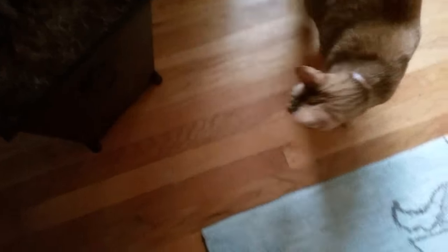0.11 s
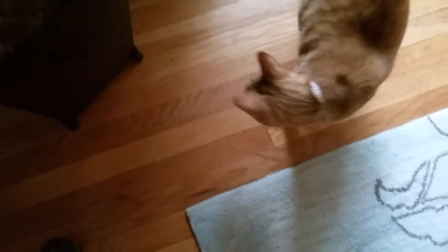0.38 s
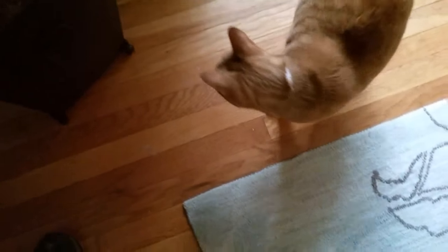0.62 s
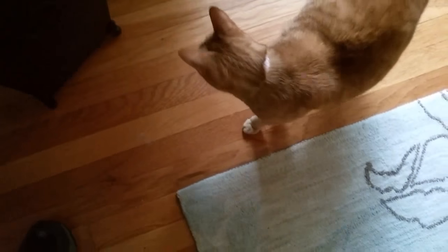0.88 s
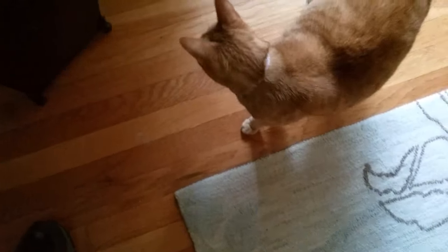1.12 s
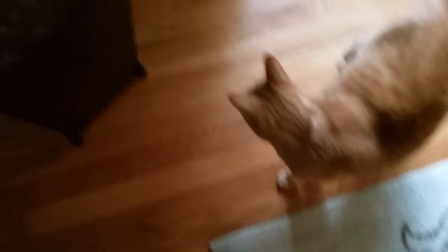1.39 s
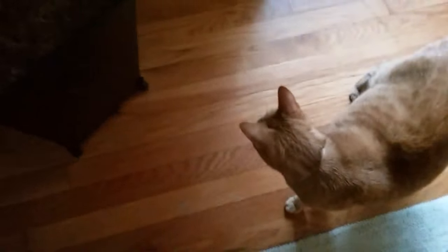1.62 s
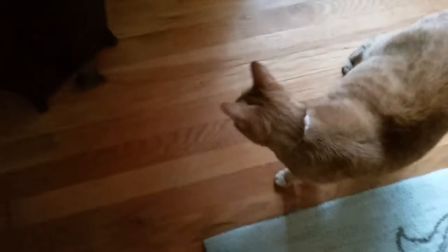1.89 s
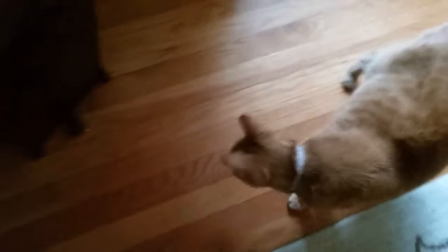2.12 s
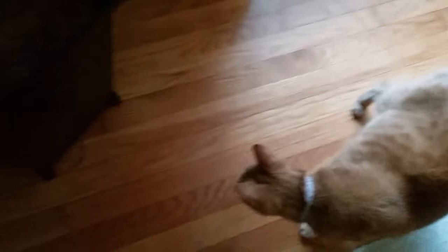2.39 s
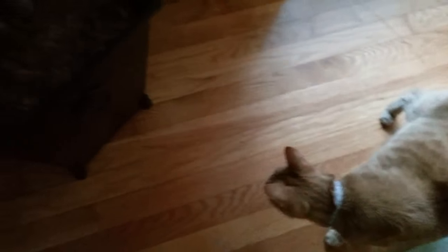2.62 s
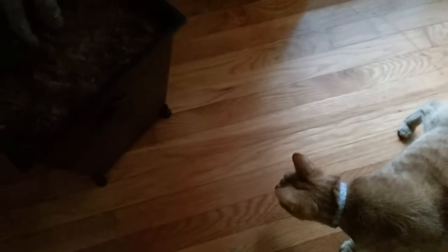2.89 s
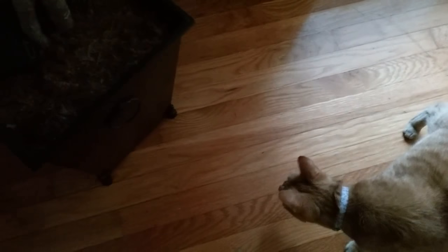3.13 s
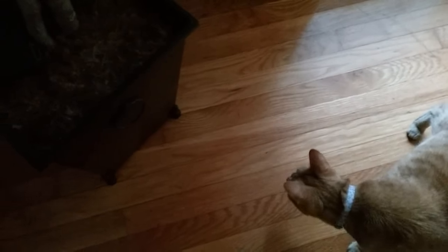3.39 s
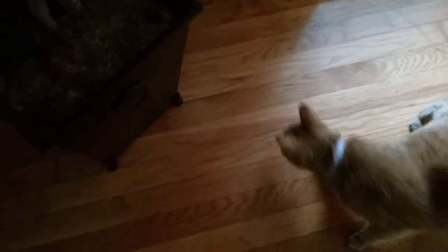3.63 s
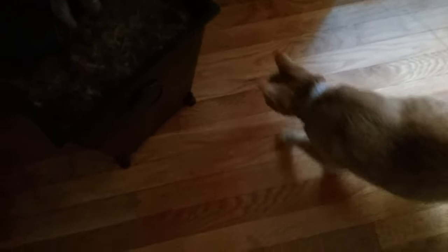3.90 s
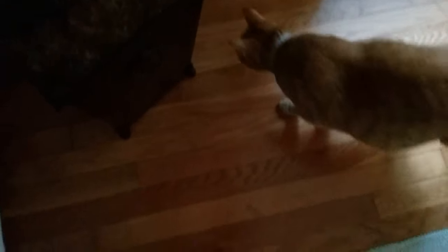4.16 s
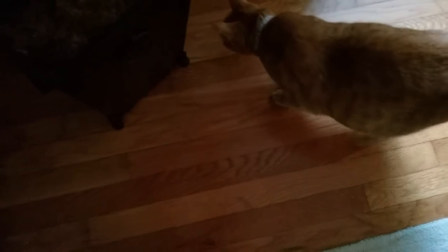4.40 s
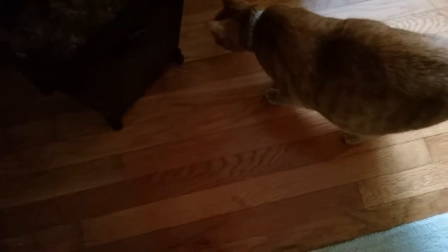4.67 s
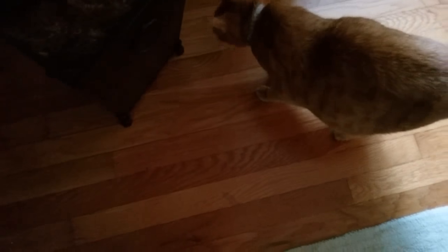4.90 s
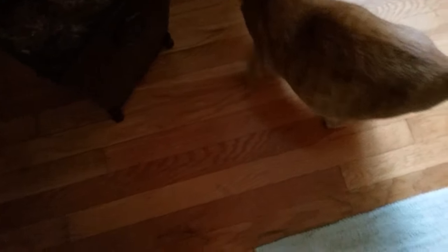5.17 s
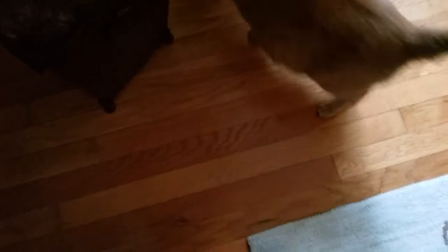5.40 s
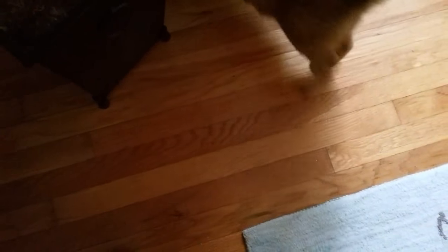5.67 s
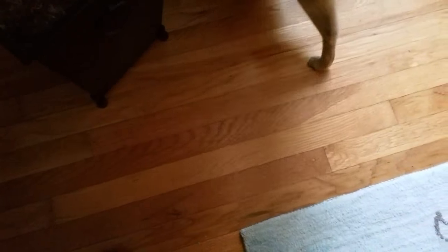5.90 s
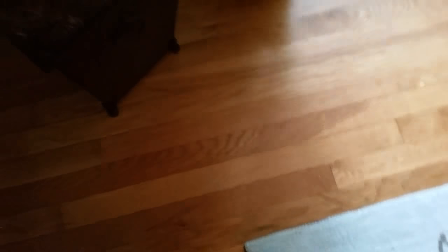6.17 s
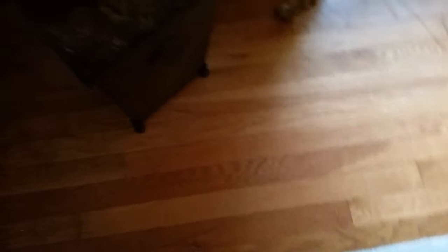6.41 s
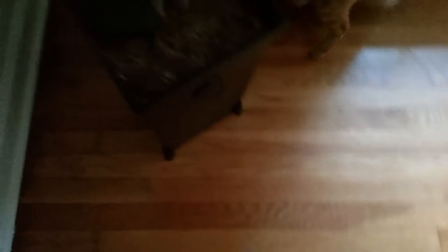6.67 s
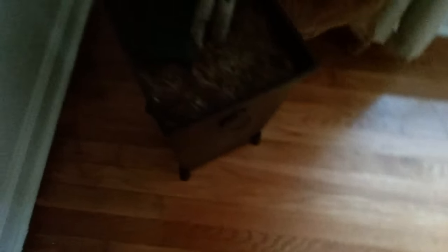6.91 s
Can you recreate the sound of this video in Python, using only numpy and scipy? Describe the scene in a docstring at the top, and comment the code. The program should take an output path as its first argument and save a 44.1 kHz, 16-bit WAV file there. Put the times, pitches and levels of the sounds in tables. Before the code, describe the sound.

A quiet room with a hardwood floor, picked up close by a hand-held phone with faint low hiss. Soft rubbing lies underneath throughout. A small knock comes at once, with tiny claw ticks through the first 0.7 s. Soft paw thumps begin, with a clearer one at 1.2 s, while a light, dense patter builds from about 1.3 s. At 2.1 s a heavy padded landing hits, followed by a claw click and a sharp woody knock at 2.27 s; scuffing trails away and the patter stops by 2.5 s. From 2.6 to 4.8 s only faint ticks, small taps and brushing remain. At 4.9 s comes the strongest thud, with hard knocks and scuffing. Lighter steps follow, then another thump and knock near 5.63 s. Small taps and short scrapes around 6 to 6.3 s give way to faint rubbing until about 7 s.

```python
"""A cat stalks a small toy and pounces on a wooden floor indoors, near a hand-held phone.
Over faint rubbing come a knock and small claw ticks, then from 0.7 s a patter and soft paw thumps.
Heavier landings, knocks and scuffs come near 2.1 s, again from 4.9 s and near 5.6 s; rubbing ends it.
Thumps and knocks ring board modes, ticks are damped sines, scuffs and hiss are noise; the room answers.
The phone has two unlike microphone ports and turns quiet sound further down."""
import sys
import numpy as np
from scipy import signal
from scipy.fft import rfft, irfft, next_fast_len
from scipy.io import wavfile
from scipy.ndimage import uniform_filter1d, minimum_filter1d, map_coordinates

SR = 44100
rng = np.random.default_rng(int(sys.argv[2]) if len(sys.argv) > 2 else 0)


def level_to_linear(level):
    """Convert decibel levels to linear amplitude factors, elementwise."""
    exponent = np.asarray(level, float) / 20
    return 10 ** exponent


def master_out(mix):
    """Clip the mix to full scale and print it as 16-bit PCM to the path in sys.argv[1]."""
    frames = np.transpose(np.atleast_2d(mix))
    ceiling = np.clip(frames, -1, 1)
    pcm = np.round(ceiling * 32767).astype(np.int16)
    wavfile.write(sys.argv[1], SR, pcm)


N = 310407  # length [samples]


def unit(x):
    """x at rms 1."""
    return x / np.sqrt(np.mean(x ** 2) + 1e-20)


def along(points, hz):
    """(Hz, value) points read on a log frequency axis."""
    f, v = np.transpose(points)
    return np.interp(np.log(hz + 1), np.log(f + 1), v)


def filtered(x, response):
    """x times a complex response of frequency."""
    n = x.shape[-1]
    m = next_fast_len(n + 8192)
    return irfft(rfft(x, m) * response(np.fft.rfftfreq(m, 1 / SR)), m)[..., :n]


def pair(two):
    """Two unrelated signals mixed to the likeness that the ports hear."""
    # left-right likeness of diffuse sound: (frequency [Hz], correlation [0-1])
    likeness = [(100, 0.95), (400, 1), (1200, 0.33), (2500, 0.63), (6000, 0.051)]

    def turn(hz):
        return np.arccos(np.clip(along(likeness, hz), 0, 1)) / 2

    mid, side = filtered(two, lambda hz: np.array([np.cos(turn(hz)), np.sin(turn(hz))]))
    return np.array([mid + side, mid - side])


def boards(length_s, scatter_db, spread=0.):
    """The ring of the floor after one unit blow: new strengths, phases spread over a share of a turn."""
    # modes of the boards under the animal: (frequency [Hz], level [dB], t60 [s])
    board_modes = [(163, -21, 0.048), (215.5, 3, 1), (225.8, 12.5, 0.053), (295.3, 0, 0.49),
                   (356, -1, 0.14), (394, 1, 0.09), (502, -9, 0.75), (608.3, 0, 0.091), (704, -12.5, 0.39),
                   (851, 0, 0.021), (884.6, 4.5, 0.02), (1185, 5.5, 0.01), (1454, -1, 0.023),
                   (1900, -27, 0.017), (2262, -4, 0.018), (2975, -22, 0.09)]
    t = np.arange(int(length_s * SR)) / SR
    hz, db, t60 = np.transpose(board_modes)[:, :, None]
    level = db + scatter_db * rng.standard_normal(db.shape) - 60 * t / t60
    phase = 2 * np.pi * (hz * t + spread * rng.random(db.shape))
    return (level_to_linear(level) * np.sin(phase)).sum(0)


def add(out, s, sound, wet_db, seed):
    """Places a sound and a fresh room echo of its seed blow, each frequency dying at its own speed."""
    # decay of the room: (frequency [Hz], t60 [s])
    room_decay = [(80, 0.18), (300, 0.58), (600, 0.37), (1000, 0.24), (3000, 0.2), (10000, 0.36)]
    hz, t, z = signal.stft(rng.standard_normal((2, SR // 2)), SR, nperseg=256)
    decaying = z * level_to_linear(-60 * t / along(room_decay, hz)[:, None])
    tail = pair(signal.istft(decaying, SR, nperseg=256)[1])
    late = np.clip(np.arange(tail.shape[1]) / SR / 0.0017, 0, 1)  # walls answer a little late
    tail *= late / np.linalg.norm(tail[0])
    heard = level_to_linear(wet_db) * signal.fftconvolve(seed[None], tail, axes=1)
    heard[:, :len(sound)] += sound
    i = round(s * SR)
    out[:, i:i + heard.shape[1]] += heard[:, :out.shape[1] - i]


def scuff():
    """Fur and pads rub the wood: noise in drifting patches with sparse fibre ticks, in uneven strokes."""
    # spectrum of the rubbing: (frequency [Hz], relative density [dB per Hz])
    fur_colour = [(200, -43), (500, 2), (1000, 2.5), (2000, -0.5), (4000, -9), (8000, -18), (14000, -16.5)]
    # strokes: (start [s], length [s], mid-stroke level [dB], swell from start to end [dB])
    strokes = [(1.34, 0.3, -76, 22), (1.641, 0.45, -65, 0.5), (2.082, 0.31, -67.5, -3),
               (2.293, 0.35, -59, -12.5), (2.62, 0.4, -83, 21), (3.715, 0.017, -80, 0),
               (3.836, 0.02, -93, -8), (4.33, 0.77, -74.5, -3), (4.896, 0.21, -63, -3),
               (5.02, 0.39, -71, -11), (5.387, 0.13, -65.5, 15), (5.517, 0.11, -67, -13),
               (5.635, 0.18, -60.5, -12.5), (5.82, 0.35, -65, 5), (6.109, 0.021, -55, 6),
               (6.147, 0.15, -63, 5), (6.165, 0.013, -67, 2), (6.307, 0.035, -63.5, -11),
               (6.32, 0.91, -74.5, -9.5)]
    rest_db = -71  # faint rubbing under all strokes
    edge_s = 0.023  # fade at both ends of a stroke
    flutter_db, flutter_per_s = 1.2, 20  # unevenness of the rubbing

    fibres = (rng.random((2, N)) < 60 / SR) * 5 * rng.standard_normal((2, N))
    z = signal.stft(rng.standard_normal((2, N)) + fibres, nperseg=512)[2]
    field = uniform_filter1d(rng.standard_normal(z.shape[1:]), 16, 0)  # smooth over frequency
    field = uniform_filter1d(field, 5, 1)  # and over time
    patchy = signal.istft(z * level_to_linear(1.5 * unit(field)), nperseg=512)[1][:, :N]
    rub = unit(pair(filtered(patchy, lambda hz: level_to_linear(along(fur_colour, hz)))))

    t = np.arange(N) / SR
    pressure = np.full(N, level_to_linear(rest_db))
    for s, length, db, swell_db in strokes:
        swell = level_to_linear(db + swell_db * np.clip((t - s) / length - .5, -1, 1))
        inside_s = np.minimum(t - s, s + length - t)
        pressure += swell * np.clip(inside_s / edge_s + .5, 0, 1)
    flutter = map_coordinates(rng.standard_normal(400), [t * flutter_per_s])
    return pressure * level_to_linear(flutter_db * flutter) * rub


def knocks():
    """Paw bones and toy: a hard contact rings the upper board modes and chatters briefly."""
    # knocks: (time [s], ring peak [dB], click over the ring [dB], favoured pitch [Hz])
    hits = [(0.064, -44, -10, 880), (1.185, -46, -25, 790), (1.268, -44, -18, 870), (1.688, -44, -20, 710),
            (1.722, -44, -20, 750), (1.902, -47, -20, 900), (2.09, -32, -16, 1040), (2.265, -19, 0, 900),
            (2.271, -22, -5.5, 910), (2.282, -24.5, -8.5, 613), (2.551, -35, -7, 850),
            (3.132, -41, -14, 840), (3.8298, -50, 8, 800), (3.8322, -54, 10, 900), (4.494, -45, -8, 640),
            (4.566, -46, -6.5, 705), (4.677, -47, -6, 744), (4.745, -67, 12, 910), (4.894, -26, -16, 900),
            (4.947, -27.5, -3.5, 950), (4.957, -28, -5, 605), (5.28, -50, -8, 804), (5.536, -44, -14, 915),
            (5.621, -39, -30, 690), (5.632, -28.5, -1, 890), (5.641, -28.5, -11, 596),
            (5.957, -48, -8, 595), (5.975, -48, -12, 620)]
    # spectrum of the click: (frequency [Hz], relative density [dB per Hz])
    click_colour = [(600, -16), (1200, 15), (2500, 6.5), (4000, 1), (7000, -13), (12000, -13.5),
                    (16000, -30)]
    favour_width, favour_db = 0.21, 4  # the struck spot lifts modes near one pitch: width over pitch, lift
    soft_hz, click_db_per_octave = 5870, 13.5  # the duller the contact, the fewer upper modes it reaches
    body_t60_s = 0.77  # the body resting on the boards shortens their ring
    chatter_t60_s, echo_db = 0.031, -2

    out, t = np.zeros((2, N)), np.arange(int(.2 * SR)) / SR
    impulse = 1.0 * (np.arange(len(t)) == 64)
    snap = filtered(impulse, lambda hz: level_to_linear(along(click_colour, hz)))
    rise = 1 - np.exp(-t / 0.00024)
    chatter = rise * level_to_linear(-60 * t / chatter_t60_s)
    for s, db, click_db, pitch in hits:
        top = soft_hz * 2 ** (click_db / click_db_per_octave)

        def contact(hz):
            band = 1j * hz * favour_width * pitch
            spot = 1 + level_to_linear(favour_db) * band / (pitch * pitch - hz * hz + band)
            light = (1j * hz / (450 + 1j * hz)) ** 3  # too light to move the whole floor
            return spot / (1 + 1j * hz / top) ** 2 * light

        struck = rise * level_to_linear(-60 * t / body_t60_s) * boards(.2, scatter_db=2.5, spread=1.0)
        ring = filtered(struck, contact)
        ring *= level_to_linear(db) / abs(ring).max()
        click = chatter * filtered(rng.standard_normal(len(t)), lambda hz: level_to_linear(along(click_colour, hz)))
        click *= level_to_linear(db + click_db) / abs(click).max()
        # the room answers the ring and a single snap as strong as the click
        seed = ring + snap * np.linalg.norm(click) / np.linalg.norm(snap)
        add(out, s, ring + click, echo_db, seed=seed)
    return out


def ticks():
    """A claw tip: a few cycles of two heavily damped modes."""
    # single ticks: (time [s], first-mode level [dB], pitch [Hz], time to fall 60 dB [cycles])
    claw_taps = [(.14, -53, 2600, 9), (.204, -53, 2500, 9), (0.4167, -43, 2900, 7), (0.421, -48, 2700, 14),
                 (0.572, -52, 4300, 7), (.648, -54, 3500, 7), (.76, -55, 3800, 7), (0.85, -55, 2700, 9),
                 (1.5935, -48, 4400, 9), (1.599, -48, 4600, 12), (1.968, -48, 4000, 9),
                 (2.1828, -25.5, 1630, 7), (2.1944, -46, 1020, 7), (2.2248, -31, 1090, 5),
                 (2.5813, -51, 2470, 7), (2.632, -38.5, 2160, 7), (2.7894, -50, 2570, 9),
                 (2.86, -51, 2460, 9), (3.0696, -51, 2600, 9), (3.465, -50, 2940, 12),
                 (3.5058, -54, 3200, 16), (3.529, -54, 2900, 12), (3.5448, -51, 3640, 7),
                 (3.638, -52, 2500, 16), (3.8345, -46, 2900, 20), (3.838, -46, 1930, 20),
                 (3.8305, -47, 5100, 16), (3.854, -49, 2600, 9), (3.906, -56, 6200, 14),
                 (4.331, -51, 3160, 9), (4.6784, -41, 3620, 20), (4.759, -50, 3200, 25),
                 (5.259, -52, 3200, 9), (6.049, -48, 2640, 7), (6.066, -50, 2600, 7), (6.123, -46, 2500, 7),
                 (6.168, -45, 2510, 7)]
    echo_db, edge_rad = -10, 1.1  # an abrupt start gives the tick its crisp top
    overtone, overtone_db = 1.77, -10.5  # second mode: pitch over the first, level
    out, t = np.zeros((2, N)), np.arange(int(.02 * SR)) / SR
    for s, db, hz, cycles in claw_taps:
        first = np.sin(2 * np.pi * hz * t + edge_rad)
        second = level_to_linear(overtone_db) * np.sin(2 * np.pi * overtone * hz * t)
        tick = level_to_linear(db - 60 * t * hz / cycles) * (first + second)
        add(out, s, tick, echo_db, seed=tick)
    return out


def scurry():
    """The toy patters over the boards: dense uneven tiny blows, each ringing briefly."""
    # strength of the patter: (time [s], level [dB])
    patter_level = [(0.7, -82), (1.25, -56), (1.45, -55), (1.62, -51), (1.69, -51.5), (1.92, -49),
                    (2.02, -49.5), (2.23, -48), (2.35, -62), (2.42, -78), (2.65, -87)]
    ring_t60_s = .045  # light contacts ring briefly
    struck = rng.random(N) < 900 / SR  # about 900 blows a second
    blows = struck * level_to_linear(2 * rng.standard_normal(N)) * np.sign(rng.standard_normal(N))
    ring = np.convolve(boards(.3, scatter_db=1), np.hanning(int(.0006 * SR)))
    ring *= level_to_linear(-60 * np.arange(len(ring)) / SR / ring_t60_s)
    patter = unit(signal.fftconvolve(blows, ring)[:N])
    # chance swells are flattened, so the patter keeps a fairly even strength
    local_power = abs(uniform_filter1d(patter ** 2, int(.02 * SR)))
    patter = patter / (local_power + .2) ** .35
    level = np.interp(np.arange(N) / SR, *np.transpose(patter_level), left=-120, right=-120)
    return level_to_linear(level) * unit(patter)


def thumps():
    """A soft pad pushes for a few ms, leaving only low modes; a paw that stays down damps the boards."""
    # landings: (time [s], peak [dB], contact [ms], t60 under the paw [s], weight reaching the joists [dB])
    landings = [(0.706, -49.5, 3.9, 0.36, 2), (0.802, -52, 3.5, .15, -17), (0.859, -47, 4, 0.41, -15),
                (1.181, -41.5, 2, 0.053, -13), (1.194, -30.5, 3, 0.14, -21), (1.202, -26, 2.9, 0.028, -29),
                (1.565, -33.5, 3.9, 0.08, -21), (1.58, -39.5, 2.5, 0.12, -10),
                (1.672, -43.5, 2.7, 0.13, -17), (1.72, -47, 3.4, 0.13, -15), (1.735, -43, 2.6, 0.066, -15),
                (1.77, -40.5, 2.8, 0.21, -15), (1.788, -44.5, 5.9, 0.5, -1), (1.805, -38.5, 3.3, 0.17, -1),
                (1.85, -47, 1.2, 0.19, -17), (1.881, -47, 2.1, 0.16, -13), (1.901, -38, 3.2, 0.066, -3),
                (1.944, -45.5, 2.8, 0.12, -25), (2.098, -21.5, 1.74, 0.28, -18),
                (2.106, -17, 1.98, 0.11, 2), (2.149, -33, 3.2, 0.2, -10), (2.175, -53, 3.6, 0.13, -11),
                (2.205, -39, 1.7, 0.29, -8), (2.232, -25, 3.5, 0.083, 10), (3.14, -41, 4.4, 0.33, 5),
                (3.844, -43.5, 7.5, 0.23, -12), (4.502, -40, 1.2, 0.33, -24), (4.905, -15, 3.1, 0.065, 8.5),
                (4.912, -16.5, 4.8, 0.094, -10), (4.942, -28.5, 1.7, 0.17, -6), (5.022, -38, 1.4, 0.45, 18),
                (5.077, -37.5, 2.9, 0.27, -12), (5.287, -40.5, 0.95, 0.43, -4), (5.312, -43, 5.4, 0.29, 2),
                (5.442, -43, 1.2, 0.26, -20), (5.51, -40, 1.9, 0.15, -13), (5.52, -39.5, 1, 0.25, -12),
                (5.536, -40.5, 2.3, 0.15, -17), (5.634, -25, 4.9, 0.11, 19.5),
                (5.642, -19.5, 2.5, 0.063, 9), (5.667, -31.5, 2.5, 0.25, 6), (5.979, -47.5, 2.9, 1, 20)]
    # beams under the boards, which a paw cannot damp: (frequency [Hz], level [dB], t60 [s])
    joist_modes = [(72.3, -9, 1), (126, -1, 0.052)]
    # the more a paw damps the boards, the less reaches the room
    free_t60_s, free_echo_db, echo_db_per_halving = 0.16, -3.5, 4
    out, t = np.zeros((2, N)), np.arange(int(.3 * SR)) / SR
    joists = sum(level_to_linear(db - 60 * t / t60) * np.sin(2 * np.pi * hz * t) for hz, db, t60 in joist_modes)
    joists = joists * np.cos(np.pi / 2 * t / t[-1])  # fades out by the end of the ring
    for s, db, ms, t60, weight_db in landings:
        damped_t60 = max(t60, .02)
        ring = level_to_linear(-60 * t / damped_t60) * boards(.3, scatter_db=1.5) + level_to_linear(weight_db) * joists
        push = np.hanning(max(3, int(ms * SR / 1000)))
        ring = np.convolve(ring, push)
        ring *= level_to_linear(db) / abs(ring).max()
        echo_db = free_echo_db + echo_db_per_halving * np.log2(damped_t60 / free_t60_s)
        add(out, s, ring, echo_db, seed=ring)
    return out


def scene():
    """Everything on the floor."""
    return scuff() + knocks() + ticks() + scurry() + thumps()


def expand(x, knee_db, span_db, depth_db, hold_s, smooth_s):
    """Gain control: full above the knee, sinking by up to depth as the held level falls below it."""
    power = abs(uniform_filter1d(np.mean(x ** 2, 0), int(0.0011 * SR)))
    hold = int(hold_s * SR) // 2 * 2 + 1
    held = -minimum_filter1d(-power, hold, origin=hold // 2)  # highest recent power
    under = np.clip((knee_db - 10 * np.log10(held + 1e-12)) / span_db, 0, 1)
    return x * level_to_linear(-depth_db * uniform_filter1d(under, int(smooth_s * SR) + 1))


def low_pass(x):
    """Removes everything above the highest recorded frequency."""
    return signal.sosfilt(signal.butter(12, 16940, fs=SR, output="sos"), x)


def record(dry):
    """The phone: port colour and delay, bass cut, self-noise, an expander on the bass and one on all."""
    # colour of the left and the right port, one list each: (frequency [Hz], level [dB])
    port_colours = [
        [(500, 3), (1400, 1), (2400, -2), (3400, -8), (4100, 4), (4800, 13.5), (5700, 2), (7000, 3.5),
         (14000, -6)],
        [(500, 3.5), (1400, 5), (1900, 8), (2400, 12), (3400, 11.5), (4100, 11.5), (4800, 2), (5700, 0),
         (7000, 0), (14000, -14)],
    ]
    # microphone self-noise: (frequency [Hz], relative density [dB per Hz])
    hiss_colour = [(25, -16), (60, 5), (120, 6.5), (400, 3.5), (1200, -6.5), (2500, -9.5), (5000, -17.5),
                   (13000, -20), (16000, -20)]
    right_lag_ms = 0.308
    bass_cut_hz, bass_cut_q = 75.3, 0.66

    def ports(hz):
        lag = np.exp(-2j * np.pi * hz * [[0], [right_lag_ms / 1000]])
        return level_to_linear([along(port, hz) for port in port_colours]) * lag

    def cut(hz):
        return (hz * hz / (hz * hz - bass_cut_hz ** 2 - 1j * hz * bass_cut_hz / bass_cut_q)) ** 3

    x = filtered(dry, lambda hz: ports(hz) * cut(hz))
    hiss = unit(filtered(rng.standard_normal((2, N)), lambda hz: level_to_linear(along(hiss_colour, hz))))
    x = x + level_to_linear(-59.5) * hiss
    bass = filtered(x, lambda hz: 1 / (1 + (hz / 900) ** 4))
    treble = x - bass
    x = treble + expand(bass, knee_db=-40.5, span_db=3, depth_db=11, hold_s=0.0095, smooth_s=0.026)
    x = expand(x, knee_db=-48.5, span_db=41.0, depth_db=5, hold_s=0.023, smooth_s=0.015)
    x = x / (1 + abs(x / .26) ** 4) ** (1 / 4)  # the input stage rounds off the highest peaks
    mix = x - .0005  # a small converter offset
    return low_pass(mix)


dry = scene()
out = record(dry)
master_out(out)
```